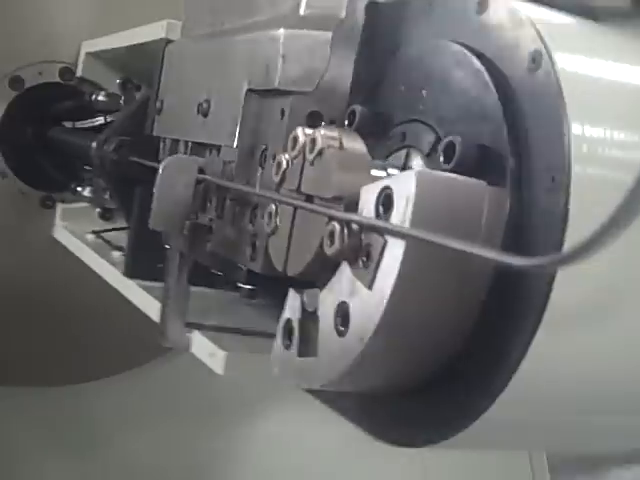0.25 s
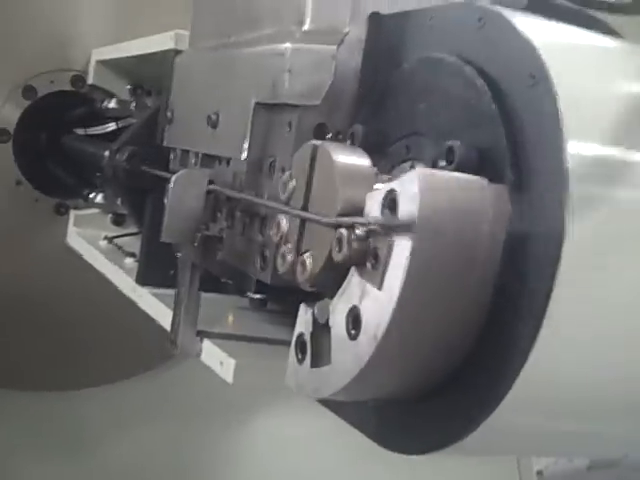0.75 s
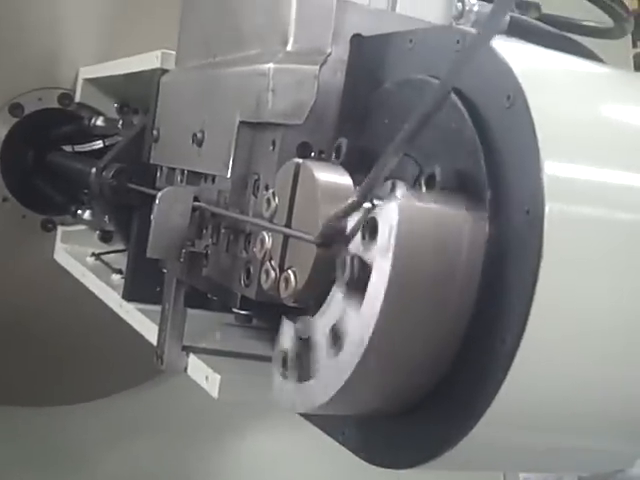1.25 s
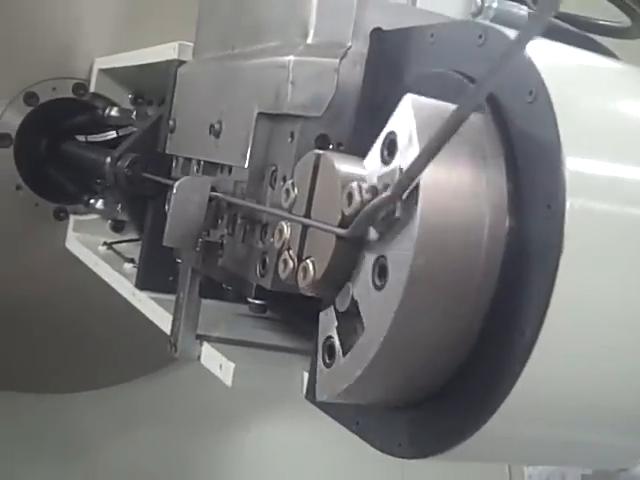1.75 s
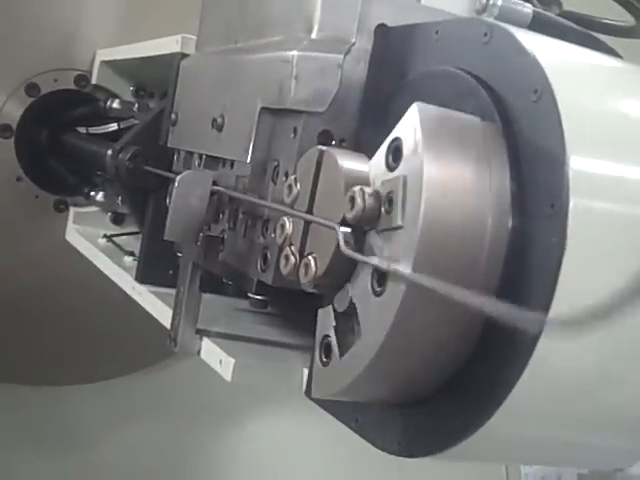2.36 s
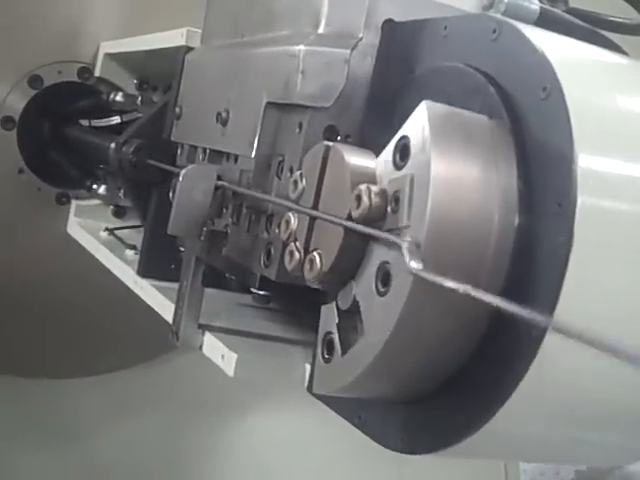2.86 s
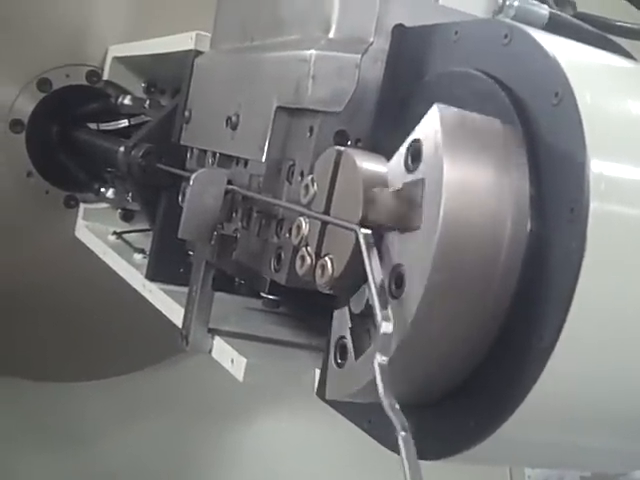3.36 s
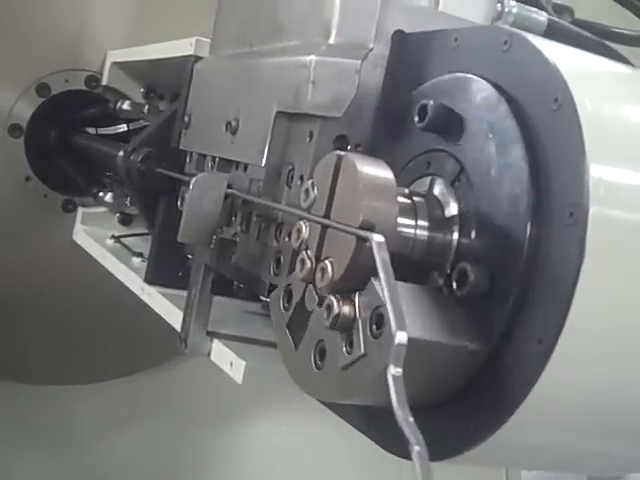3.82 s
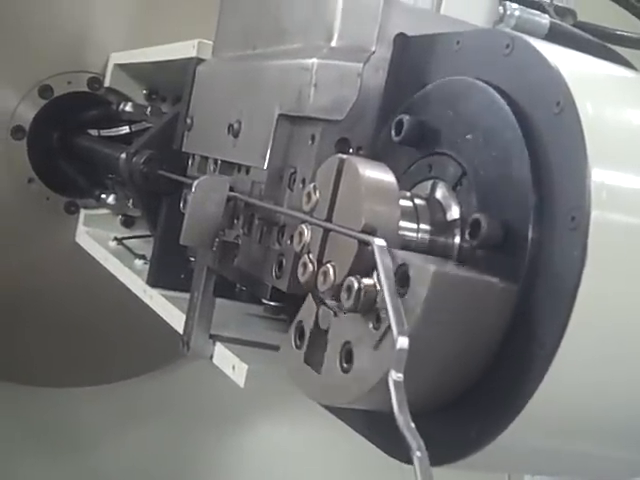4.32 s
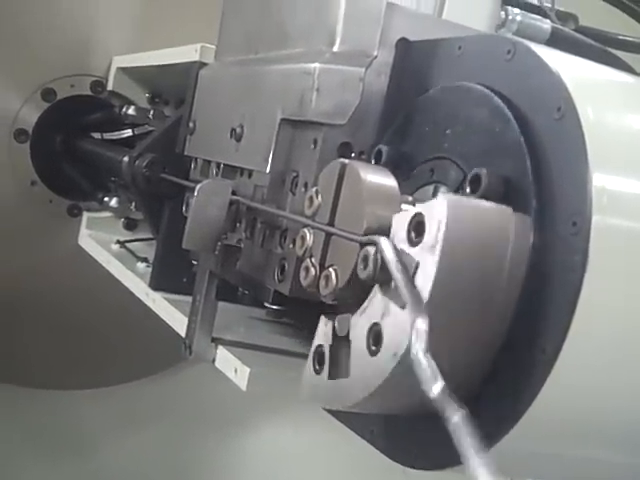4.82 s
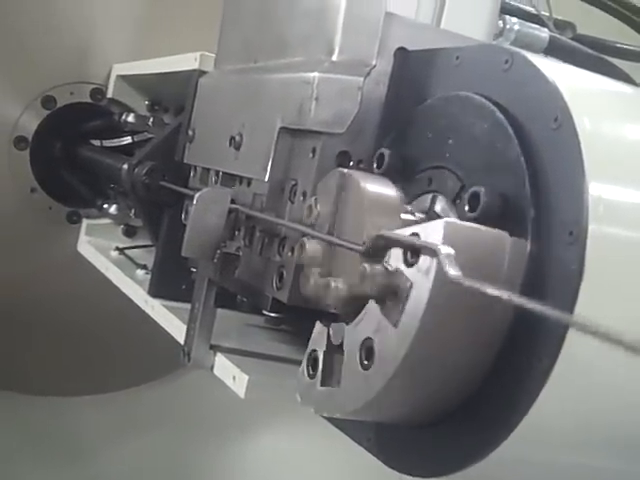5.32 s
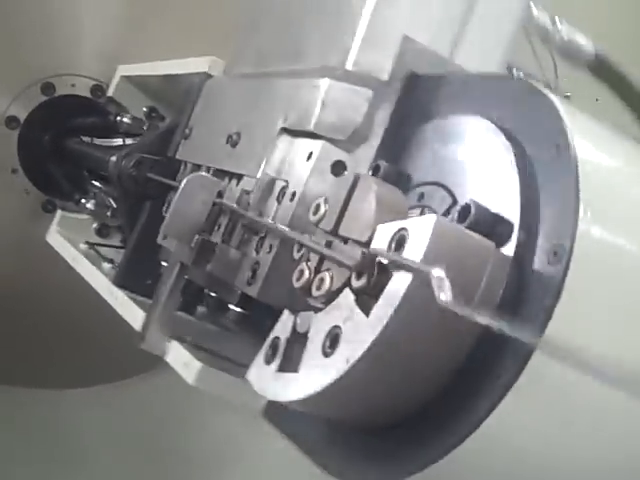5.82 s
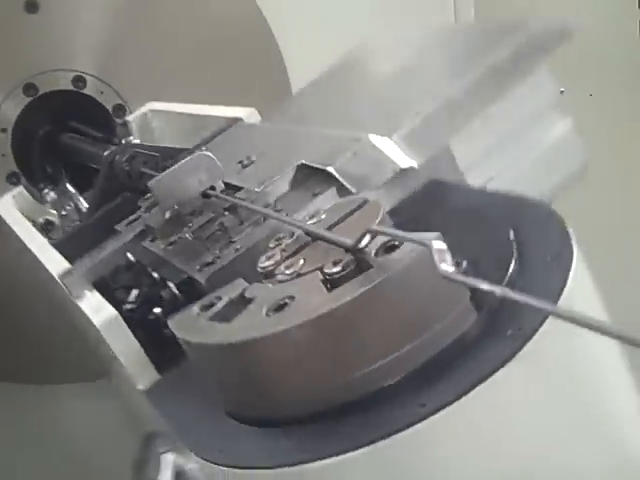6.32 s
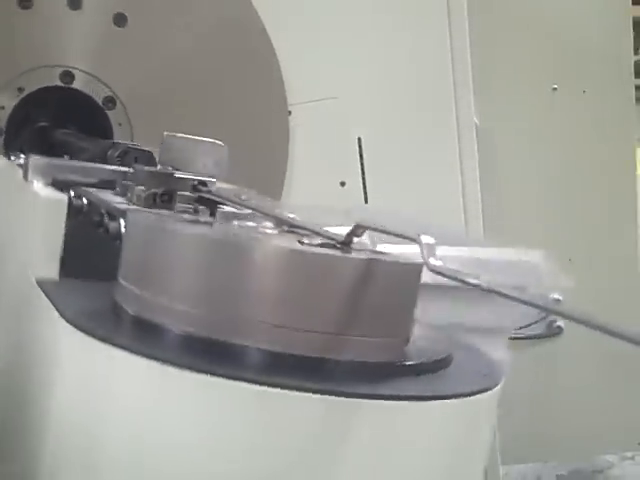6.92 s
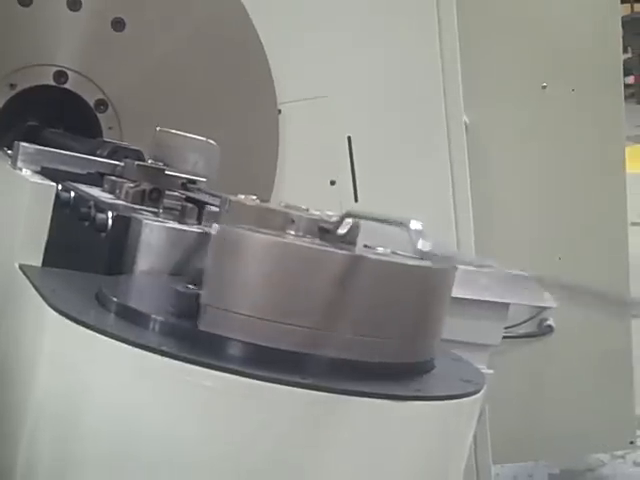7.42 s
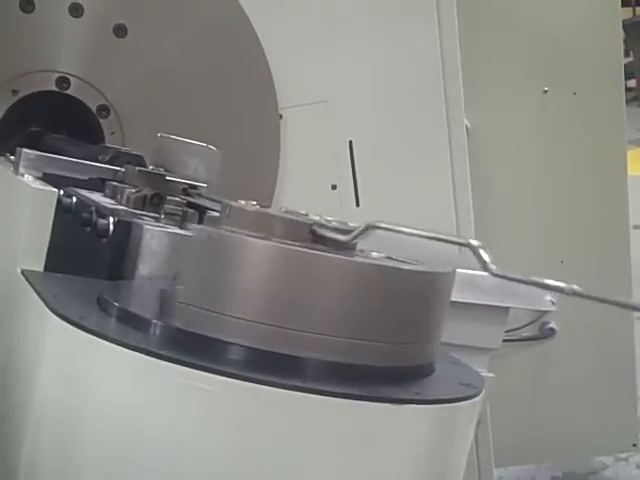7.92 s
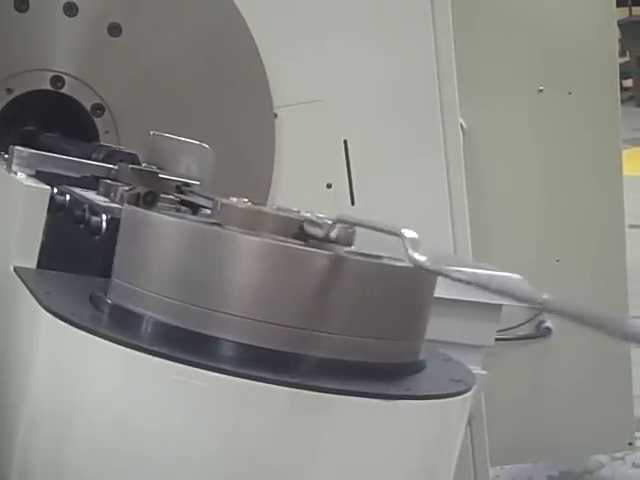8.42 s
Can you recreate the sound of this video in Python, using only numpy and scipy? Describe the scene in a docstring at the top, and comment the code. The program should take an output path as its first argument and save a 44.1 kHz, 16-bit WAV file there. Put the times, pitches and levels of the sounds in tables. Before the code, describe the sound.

A wire bending machine hums and hisses steadily up close while its tool head clanks in irregular steel knocks, with air spits and light wire ticks.

```python
"""Wire bending machine at close range

Pump harmonics and fan tones hum in filtered noise, under the whistle of servo drives at twice their switching rate.
Air valves spit noise bursts, servos whir in sidebands, and gears whine once as the head swings.
After a short hard click the tool head clanks on its stops (noise, decaying modes); the steel wire ticks and rings.
An automatic gain control sinks while its treble average is high, then lets the hum swell back."""
import sys
import numpy as np
from scipy import signal
from scipy.fft import rfft, irfft, next_fast_len
from scipy.io import wavfile
from scipy.ndimage import uniform_filter1d

SR = 44100
rng = np.random.default_rng(int(sys.argv[2]) if len(sys.argv) > 2 else 0)


def wav_record(signal):
    """Record a signal, one row per channel, as 16-bit PCM in the file named by sys.argv[1]."""
    frames = np.transpose(np.atleast_2d(signal))
    bounded = np.clip(frames, -1, 1)
    # unit amplitude maps onto the largest positive 16-bit level
    quanta = np.round(bounded * 32767).astype(np.int16)
    wavfile.write(sys.argv[1], SR, quanta)


N = 382347

TIME = np.arange(N) / SR  # s
AGE = np.arange(SR // 2) / SR  # s since the start of an event


def amp(db):
    """Decibels to gain."""
    return 10 ** (np.asarray(db) / 20)


def unit(x):
    """Scales to rms 1."""
    return x / np.sqrt(np.mean(x ** 2) + 1e-20)


def read(points, hz):
    """Reads a table on a log-frequency axis."""
    f, value = np.transpose(points)
    return np.interp(np.log(hz + 1), np.log(f + 1), value)


def follow(rows):
    """Each column of a curve at every sample."""
    s, *columns = np.transpose(rows)
    return [np.interp(TIME, s, c) for c in columns]


def tilted(rows, slope_db):
    """Tips the levels of a spectrum or of modes by so many dB per octave."""
    return [(hz, db + slope_db * np.log2(hz), *rest) for hz, db, *rest in rows]


def add(mix, s, sound):
    """Mixes a sound in at time s."""
    part = mix[max(round(s * SR), 0):][:len(sound)]
    part += sound[:len(part)]


def noise(spectrum, size):
    """Noise of rms 1, shaped by (hz, relative dB) points."""
    n = next_fast_len(size)
    bins = rfft(rng.standard_normal(n))
    gain = amp(read(spectrum, np.fft.rfftfreq(n, 1 / SR)))
    return unit(irfft(bins * gain, n)[:size])


def drift(per_s):
    """Slow random wander of rms 1, with so many knots per second."""
    knots = rng.standard_normal(1024)
    return unit(np.interp(TIME * per_s, np.arange(len(knots)), knots))


def tone(hz):
    """A sine that follows a pitch curve."""
    return np.sin(2 * np.pi * (np.cumsum(hz) / SR + rng.random()))


def decay(hold_s, t60_s):
    """Holds at 1, then falls 60 dB per t60."""
    return amp(-60 * np.maximum(AGE - hold_s, 0) / t60_s)


def burst(hold_s, t60_s, rise_s):
    """Rises exponentially, holds, then dies away."""
    return (1 - np.exp(-AGE / rise_s)) * decay(hold_s, t60_s)


def ring(modes, hold_s, scatter_db, detune):
    """Modes held, then decaying; every blow lands elsewhere, which weights and shifts them anew."""
    hz, db, t60_s = np.transpose(modes)[:, :, None]
    weight = amp(db + scatter_db * rng.standard_normal(db.shape))
    hz = hz * (1 + detune * rng.uniform(-0.96, 1, db.shape))
    waves = np.sin(2 * np.pi * (hz * AGE + rng.random(db.shape))) * decay(hold_s, t60_s)
    return (weight * waves).sum(0) / np.sqrt((weight ** 2).sum() / 2)


def hall(x):
    """Scattered echoes of the workshop, each frequency band dying at its own rate."""
    # decay time of the hall: hz, t60_s
    hall_decay = [(120, 0.48), (700, 1), (2000, 0.47), (4000, 0.37), (8000, 0.19), (15000, 0.49)]
    index = np.arange(SR)
    taps = rng.standard_normal(SR) * (rng.random(SR) < .1) * (index > .005 * SR)
    hz, t, z = signal.stft(taps, SR, nperseg=256)
    fade = amp(-60 * t / read(hall_decay, hz)[:, None])
    tail = signal.istft(z * fade, SR, nperseg=256)[1]
    return signal.fftconvolve(x, tail / np.linalg.norm(tail))[:N]


def hum(roar_db=-1, pump_db=-2, fan_db=-2, upper_db=4.5, waver_db=1.07, wobble=0.000394):
    """Pump harmonics and fan tones waver in the rush of cooling air."""
    # low and high air noise spectra: hz, relative_db_per_hz
    roar = [(25, -21), (65, -30), (130, -16.5), (280, -7.5), (430, -11.5), (600, -6), (1000, -6),
            (1500, -10.5), (2200, -14), (3200, -22), (5500, -60)]
    hiss = [(1000, -22.5), (1900, 1), (2400, -6), (3200, -6.5), (5200, -6.5), (7000, -11.5), (9500, -15.5),
            (11500, -19), (13000, -29.5), (16000, -36)]
    # pump harmonics: multiple_of_pulse_rate, relative_db
    pump = [(1, -11.5), (2, 2.5), (3, -7), (4, -11), (5, -12.5), (6, -7), (8, -15), (10, -17), (11, -15),
            (12, -16.5), (13, -10.5), (14, -11.5), (15, -11.5), (16, -43), (18, -15.5), (21, -22)]
    # fan and motor tones: hz, relative_db
    fan = [(310.2, 1), (2019, -18.5), (2125, -17), (5238, -19), (5507, -27), (5868, -17)]
    pump_hz = 359.22  # mean pulse rate
    low, high = amp(-40.5), amp(-45.5)
    speed = 1 + wobble * drift(7)
    lines = [(k * pump_hz, db + pump_db) for k, db in pump] + [(hz, db + fan_db) for hz, db in fan]
    tones = np.zeros(N)
    for hz, db in lines:
        base = low if hz < 1500 else high * amp(upper_db)
        tones += base * amp(db + waver_db * drift(13)) * tone(hz * speed)
    low_air = low * amp(roar_db + .8 * drift(25)) * noise(roar, N)
    high_air = high * amp(.5 * drift(33)) * noise(hiss, N)
    return tones + low_air + high_air


def servos(whir_db=-3, rub_db=-3, ripple=0.42, skirt_db=-11):
    """Drives whistle with load; sidebands fan out as a motor speeds up; gears whine through the swing."""
    # extra load on the drives: start_s, length_s, whistle_level_db
    loads = [(0.423, .08, -63), (1.162, 0.29, -51), (2.326, 0.6, -55), (3.304, 0.23, -49.5),
             (3.75, 0.78, -56.5), (4.547, 0.54, -60), (5.28, 0.096, -48), (6.797, .38, -58),
             (7.188, 0.2, -38.5), (7.925, 0.23, -50), (8.27, .1, -53)]
    # quick turns of the bending head: start_s, length_s, top_field_rate_hz, relative_db
    turns = [(1.33, 0.095, 148, -27.5), (3.48, 0.18, 202, -32.5)]
    # tones of a turning servo: multiple_of_switching_rate, multiple_of_field_rate, relative_db
    sidebands = [(0, 11, -3.5), (1, -1, -1), (1, 1, 1.5), (1, 3, -12), (2, -2, -3), (2, 0, -1), (2, 2, -15),
                 (2, 4, -22), (3, -1, -16), (3, 1, -15), (3, 3, -22)]
    # gear whine in the swing of the whole head: time_s, mesh_hz, level_db
    swing = [(6.229, 520, -69), (6.262, 557, -46), (6.305, 557, -34), (6.42, 549, -35.5), (6.5, 546, -40.5),
             (6.55, 547, -70)]
    # gear tones: multiple_of_mesh_rate, relative_db
    gear = [(0.999, -10.5), (2, 6.5), (3, -9), (4.259, -9.5)]
    switching_hz, hold_db, load_ramp_s = 4000.4, -59, 0.089
    turn_arch = 0.76  # exponent on a half sine: quick to start, quick to brake

    load = amp(hold_db)
    for s, length_s, db in loads:
        inside_s = np.minimum(TIME - s, s + length_s - TIME)
        load = load + amp(db) * np.clip(inside_s / load_ramp_s + .5, 0, 1)
    # motor current ripple roughens the whistle
    slow_ripple = ripple * noise([(10, 1), (40, -27.0), (90, -28)], N)
    fast_ripple = amp(skirt_db) * noise([(100, 12), (250, -14), (700, -38)], N)
    current = 1 + slow_ripple + fast_ripple
    out = np.sqrt(2) * load * current * tone(np.full(N, 2 * switching_hz))

    bearings = noise([(100, -36), (350, 3), (2800, 0.0), (4000, -8), (9000, -2), (15000, -26)], N)
    for s, length_s, top_hz, db in turns:
        speed = abs(np.sin(np.pi * np.clip((TIME - s) / length_s, 0, 1))) ** turn_arch
        field_hz = top_hz * speed
        whir = sum(amp(level) * tone(round(m) * switching_hz + round(k) * field_hz)
                   for m, k, level in sidebands)
        voltage = (field_hz / 200) ** 3  # the sidebands grow with speed
        out += amp(db) * speed ** 2 * (amp(whir_db) * voltage * whir + amp(rub_db) * bearings)

    mesh_hz, swing_db = follow(swing)
    whine = sum(amp(level + 0.94 * drift(30)) * tone(k * mesh_hz) for k, level in gear)
    swinging = (TIME > swing[0][0]) * (TIME < swing[-1][0])
    return out + amp(swing_db) * whine * swinging


def wire(tick_db=-7, tick_t60_s=0.12, scrape_s=0.00084, snap=0.29, snap_s=0.00082):
    """Each touch is a short scrape of steel on steel that leaves the wire ringing."""
    # single ticks in the guide: start_s, relative_db
    ticks = [(2.4634, -33), (2.8674, -34), (4.768, -41), (5.3241, -26), (5.5747, -21.5), (5.6346, -27),
             (5.6945, -25.5), (5.8147, -25), (5.8616, -28.5), (5.9803, -29.5), (6.0312, -21),
             (6.0711, -16.5), (6.2532, -26), (6.3071, -23), (7.4111, -21.5), (7.4669, -25.5), (7.7727, -30),
             (8.5649, -17.5)]
    # spells of loose chatter: start_s, end_s, relative_db
    chatter = [(5.477, 5.858, -35.5), (6.319, 6.581, -35), (7.473, 7.579, -38), (7.795, 8.064, -30.5)]
    # scrape spectrum: hz, relative_db_per_hz
    scrape_spectrum = [(500, -7.5), (2800, -2), (6000, 2), (10000, 4), (16000, -10)]
    # modes of the wire: hz, relative_db, t60_s
    wire_modes = [(1215, -6, 0.3), (2220, -10, 0.091), (2720, 1, 0.16), (3080, -22, .09), (3065, -2, 0.2),
                  (4100, -3, 0.13), (6280, -15, 0.076), (7720, -7.5, 0.2), (9570, 12.5, 0.055),
                  (9800, -13, 0.096), (10650, 3, 0.16), (11400, -15, 0.091), (11700, 0, 0.047),
                  (12700, 1, 0.059), (13700, -25, 0.11), (14600, -30, 0.1)]
    out = np.zeros(N)
    touches = [(s, db) for start, end, db in chatter for s in rng.uniform(start, end, size=12)]
    for s, db in [*ticks, *touches]:
        hardness = rng.uniform(-0.91, 1)  # dB per octave: a harder touch is brighter
        scrape = noise(tilted(scrape_spectrum, hardness), len(AGE)) * burst(scrape_s, tick_t60_s, .0001)
        ringing = ring(tilted(wire_modes, hardness), 0, 6, .012)
        add(out, s, amp(db + tick_db) * ((1 + snap * np.exp(-AGE / snap_s)) * scrape + ringing))
    return out


def valves(air_t60_s=0.14, start_hz=15500, end_hz=8500, fall_s=0.0073, sputter=0.16,
           gust_db=-23, gust_t60_s=1.0):
    """Compressed air spits with a soft low push; some ports whistle roughly, falling with the pressure."""
    # air releases: start_s, hold_s, level_db, whistle_gain_relative_to_air
    puffs = [(0.483, 0.0076, -31, 1.2), (0.504, 0.029, -40, 0), (0.529, 0.0089, -33, 0),
             (0.642, 0.032, -37, 0), (1.176, 0.017, -37, 0), (1.221, 0.024, -33, 1.5),
             (1.482, 0.0065, -33.5, 0), (2.389, 0.034, -32.5, 0), (3.347, .038, -32.5, 0),
             (3.385, .04, -35, 1.7), (3.67, 0.0093, -31.5, 0), (5.329, .018, -29.5, 0),
             (5.356, .05, -34.5, 2.2), (5.4, 0.04, -24, 0), (5.486, 0.023, -27, 0),
             (7.188, 0.034, -26.5, 0), (7.235, 0.033, -25.5, 0), (7.295, 0.012, -17.5, 0),
             (7.867, 0.025, -31, 2.2), (8.115, .02, -35.5, 0), (8.589, 0.069, -29.5, 3)]
    # released air: hz, relative_db_per_hz
    air_spectrum = [(300, -9.5), (1000, 3), (2500, 4), (5000, 3.5), (8000, 5), (10500, 5.5), (13000, -2),
                    (16000, -13)]
    # push of the air on the microphone: hz, relative_db_per_hz
    gust_spectrum = [(12, 22), (25, -19), (60, -27), (200, -43), (1000, -90)]
    out = np.zeros(N)
    for s, hold_s, db, whistle_gain in puffs:
        pressure = 0.73 + .5 * np.exp(-AGE / 0.013) + sputter * noise([(250, 8), (900, -44)], len(AGE))
        air = pressure * noise(air_spectrum, len(AGE)) * burst(hold_s, air_t60_s, 0.0018)
        gust = amp(gust_db) * noise(gust_spectrum, len(AGE)) * burst(hold_s, gust_t60_s, 0.0044)
        flutter = 1 + 0.05 * noise([(600, 2), (2500, -40)], len(AGE))
        pitch_hz = (end_hz + (start_hz - end_hz) * np.exp(-AGE / fall_s)) * flutter
        whistle = whistle_gain * tone(pitch_hz) * burst(0.014, 0.036, 0.0008)
        add(out, s, amp(db) * (air + gust + whistle))
    return out


def clanks(modes_db=-4, clang_db=-2, free_db=-7, thud_t60_s=0.035, clang_t60_s=0.07, crack_t60_s=0.033,
           ring_t60_s=0.058, rattle=0.33, touch=2.46, room_db=-9):
    """A short hard click, then clanks: steel chatters against a stop and rings on more softly."""
    # blows of the tool head, and first a short hard click: start_s, chatter_s, body_relative_db,
    # brightness_db_per_octave, thud_relative_db, crack_relative_db, main_ring_hz, main_ring_relative_db
    blows_and_click = [(0.2545, 0.0014, -55, 2, -60, -32.5, 8300, -33),
                       (0.545, 0.003, -26, 12, -17.5, -17.5, 557, -39),
                       (0.551, 0.017, -21, 7, -31.5, -23, 567, -21.5),
                       (0.6746, 0.022, -16.5, -5.5, -29.5, -12, 2790, -23),
                       (0.7, 0.018, -18.5, 5, -24.5, -20.5, 585, -24.5),
                       (1.2843, 0.00028, -17.5, 0, -32, -10.5, 1550, -32),
                       (1.5202, 0.0066, -11, 2, -56, -15, 1816, -11),
                       (3.4466, 0.0057, -27, -3, -46, -22, 1780, -28),
                       (3.708, 0.0052, -10.5, 2, -20.5, -15.5, 2435, -10),
                       (4.804, 0.023, -37.5, -5, -53, -39, 1626, -37),
                       (5.3987, 0.0022, -36, 6, -25.5, -28, 2800, -27),
                       (5.4253, 0.01, -24, 4, -26.5, -21.5, 2770, -24),
                       (5.434, 0.019, -21.5, 3, -22.5, -21, 578, -27.5),
                       (7.2897, 0.0074, -15, -1, -22.5, -17.5, 1913, -16),
                       (7.313, 0.0093, -16.5, 1, -20.5, -16.5, 1510, -25.5),
                       (7.3655, 0.0022, -14.5, 3, -23, -15.5, 1550, -18),
                       (7.958, 0.00092, -24.5, -3, -43, -19, 1600, -24),
                       (8.156, 0.0058, -9, 3, -30, -13.5, 1610, -11.5)]
    # modes of the tool head: hz, relative_db, t60_s
    head_modes = [(832, -7, 0.47), (916, -10, 0.34), (1026, -6, 0.27), (1078, -13.5, 0.079),
                  (1219, -4.5, 0.24), (1410, -5, 0.21), (1642, -2.5, 0.2), (1727, -7, 0.12),
                  (1903, 0, 0.16), (2105, -2.5, 0.044), (2220, -6, 0.087), (2520, -50, 0.046),
                  (2415, -17, 0.048), (2800, -19, 0.038), (3150, -1, 0.067), (3100, -13, 0.059)]
    # casing noise spectra: hz, relative_db_per_hz
    thud_spectrum = [(25, -23), (90, -11), (180, -3.5), (300, -2), (430, 2.5), (650, -1), (900, 0.5),
                     (1500, -26)]
    clang_spectrum = [(400, -41), (750, -37), (1200, 10.5), (1800, 5.5), (2700, 11), (3400, -46),
                      (5500, -31), (9000, -48)]
    crack_spectrum = [(2000, -7.5), (3300, 2), (4200, 1), (5500, -1.5), (7000, -1.5), (10000, -7.5),
                      (13000, -16), (16000, -27)]
    casing, tool = np.zeros(N), np.zeros(N)
    for s, chatter_s, body_db, bright_db, thud_db, crack_db, hz, ring_db in blows_and_click:
        contact = amp(free_db) + (1 - amp(free_db)) * burst(chatter_s, 0.057, .0001)
        # the first touch is the sharpest; uneven rebounds follow
        rebounds = np.exp(rattle * (noise([(500, -1), (1500, -37)], len(AGE)) - 1))
        rebounds += touch * np.exp(-AGE / 0.00057)
        crack = amp(crack_db) * noise(crack_spectrum, len(AGE)) * burst(chatter_s, crack_t60_s, .00005)
        clang = noise(tilted(clang_spectrum, bright_db), len(AGE)) * burst(chatter_s, clang_t60_s, .0001)
        clang *= amp(body_db + clang_db)
        thud = amp(thud_db) * noise(thud_spectrum, len(AGE)) * burst(chatter_s, thud_t60_s, 0.0024)
        add(casing, s, contact * (thud + rebounds * (clang + crack)))

        modes = amp(body_db + modes_db) * ring(tilted(head_modes, bright_db), chatter_s, 0.68, 0.028)
        main = np.sqrt(2) * np.sin(2 * np.pi * hz * AGE) * burst(chatter_s, ring_t60_s, 0.0015)
        add(tool, s, contact * (modes + amp(ring_db) * main))
    # the broad casing radiates into the hall; the small tool is heard only close by
    return tool + casing + amp(room_db) * hall(casing)


def scene(room_db=-12):
    """The machine close by, with a little of the hall behind it."""
    small = valves() + wire()
    return (hum() + servos() + clanks() + small + amp(room_db) * hall(small))[None]


def gain_control(x):
    """Turns down, the treble most, while the long average of its own treble output is high."""
    # full gain reduction: hz, cut_db
    full_cut = [(300, 6), (1200, 8.5), (2200, 9.5), (5000, 12), (10000, 12.5)]
    sense_hz = 4830  # senses the treble above this
    memory_s, lag_s = 1.55, .16  # averaging time; lag of the gain
    opening_db, threshold_db, range_db = -42.5, -42, 2  # first average; cut begins; span to full cut
    hz, t, z = signal.stft(x, SR, nperseg=1024)
    treble = signal.sosfilt(signal.butter(4, sense_hz, "high", fs=SR, output="sos"), x)
    powers = np.interp(t, TIME, uniform_filter1d(treble ** 2, size=512))
    step_s, full_db = t[1], read(full_cut, 2 * sense_hz)
    average, cut = amp(opening_db) ** 2, [0]  # cut: 0 none, 1 full
    for power in powers[:-1]:
        output_power = power * amp(-full_db * cut[-1]) ** 2
        average += (output_power - average) * step_s / memory_s
        wanted = np.clip((10 * np.log10(average) - threshold_db) / range_db, 0, 1)
        cut.append(cut[-1] + (wanted - cut[-1]) * step_s / lag_s)
    gain = amp(-np.outer(read(full_cut, hz), cut))
    return signal.istft(z * gain, SR, nperseg=1024)[1][:N]


def record(dry):
    """Gain control; the loudest peaks are rounded off; then the band limit."""
    rounded = .8 * np.tanh(gain_control(dry[0]) / .8)
    lowpass = signal.firwin(401, 16000, window=("kaiser", 8), fs=SR)  # cutoff in Hz
    return signal.oaconvolve(rounded, lowpass, "same")[None]


dry = scene()
out = record(dry)
wav_record(out)
```